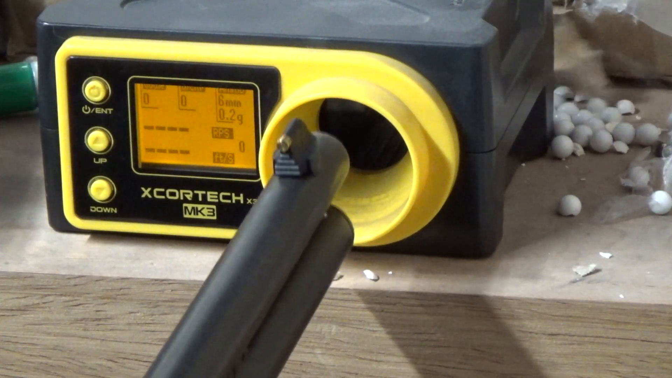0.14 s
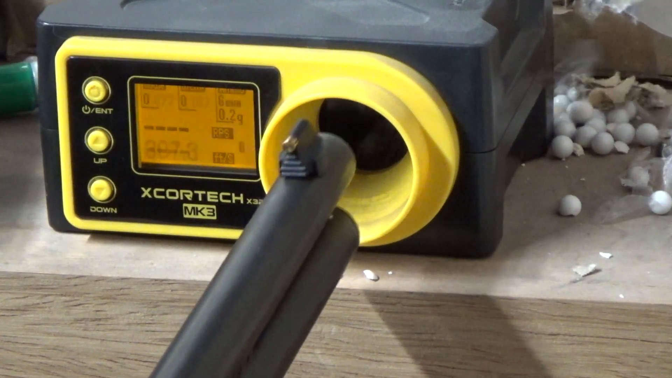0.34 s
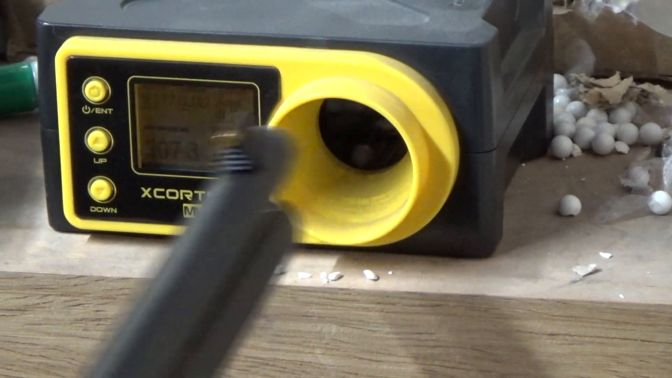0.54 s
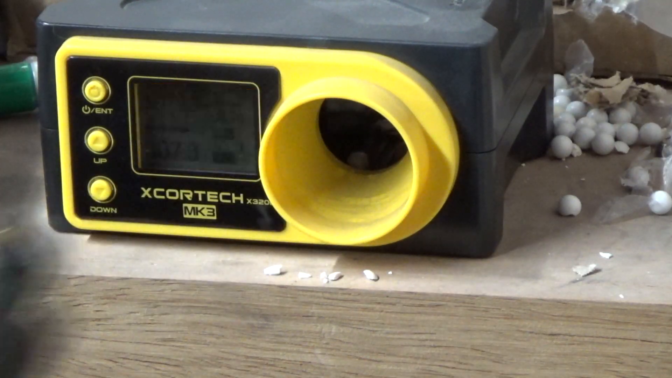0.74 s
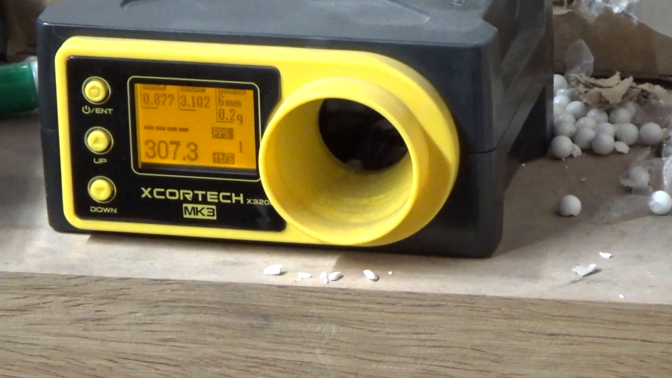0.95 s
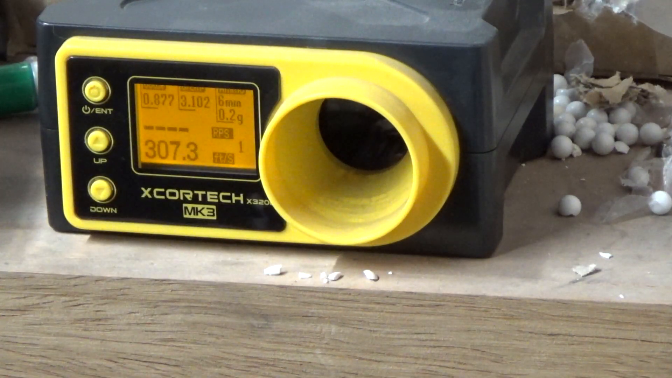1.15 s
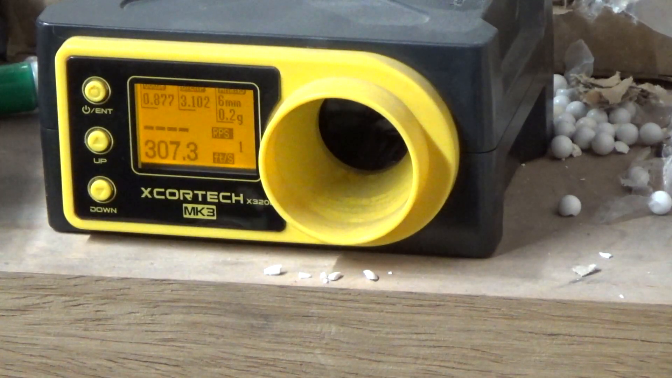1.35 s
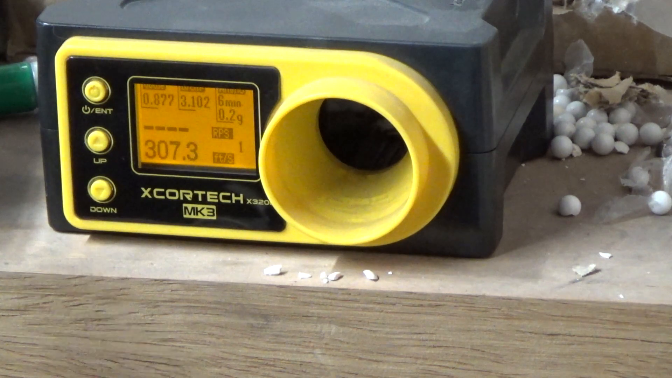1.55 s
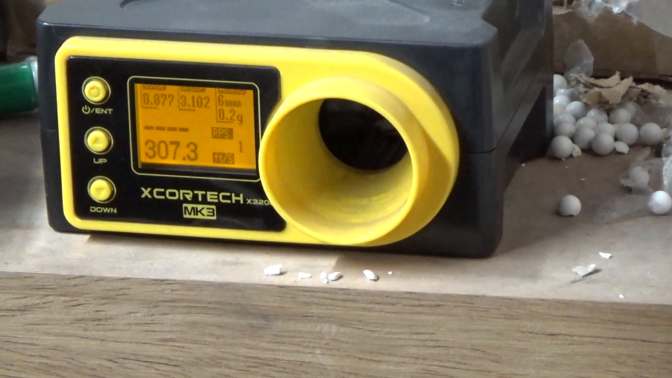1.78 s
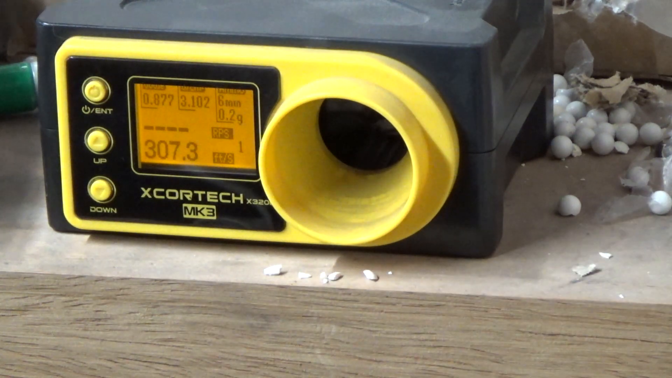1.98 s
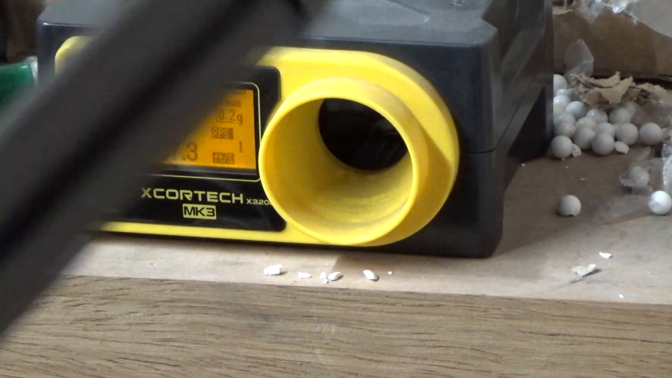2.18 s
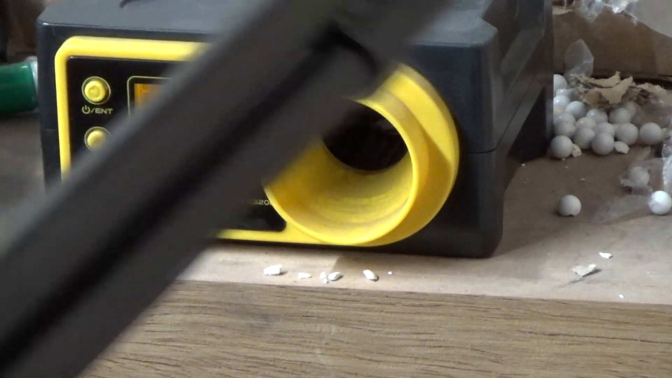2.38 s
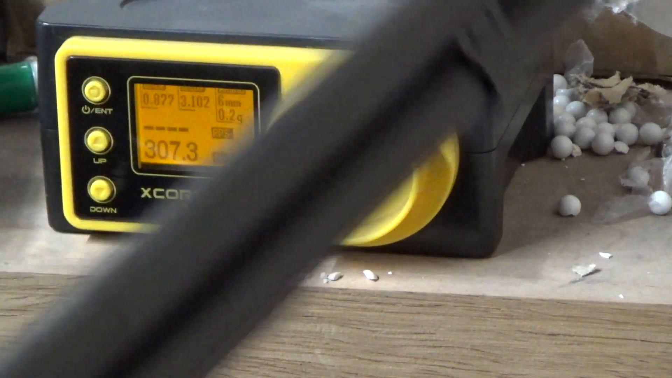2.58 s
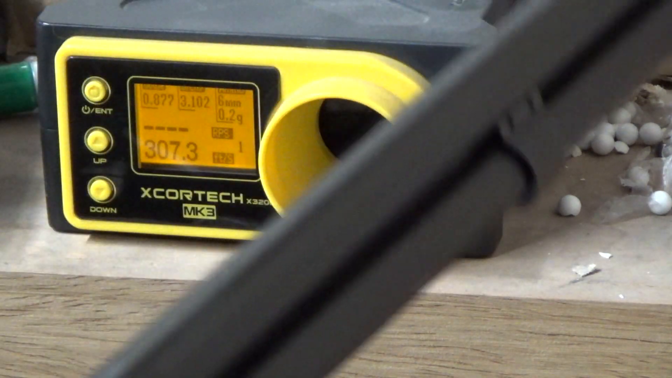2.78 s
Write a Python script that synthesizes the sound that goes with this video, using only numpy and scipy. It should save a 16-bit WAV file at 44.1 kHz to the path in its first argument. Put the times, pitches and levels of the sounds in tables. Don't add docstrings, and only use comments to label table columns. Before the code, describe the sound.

Air rifle fires with a sharp crack, pellet rattles in a trap, then lever clacks open and shut

```python
import sys
import numpy as np
from scipy import signal
from scipy.fft import rfft, irfft, next_fast_len
from scipy.io import wavfile
from scipy.ndimage import uniform_filter1d

SR = 44100
rng = np.random.default_rng(int(sys.argv[2]) if len(sys.argv) > 2 else 0)


def natural_amplitude(level_db):
    exponent = np.asarray(level_db, float) / 20
    return 10 ** exponent


def materialize(psi):
    bounded = np.clip(np.atleast_2d(psi).T, -1, 1)
    quanta = np.round(bounded * 32767).astype(np.int16)
    wavfile.write(sys.argv[1], SR, quanta)


N = 125685
TIME = np.arange(N) / SR
BLAST_S = .1594

# frequency_hz, side_over_mid_db
ROOM_WIDTH = [(60, -32), (150, -32), (380, -15.5), (950, -9.5), (2380, -13), (5980, -6.5), (15000, -21.5)]


def unit(x):
    return x / np.sqrt(np.mean(x ** 2) + 1e-20)


def along(points, hz):
    f, v = np.transpose(points)
    return np.interp(np.log(hz + 1), np.log(f + 1), v)


def filtered(x, response):
    m = next_fast_len(x.shape[-1] + 4096)
    spectrum = rfft(x, m) * response(np.fft.rfftfreq(m, 1 / SR))
    return irfft(spectrum, m)[..., :x.shape[-1]]


def body(peaks):
    def response(f):
        total = 0
        for k, (centre, width, db) in enumerate(peaks):
            damping = 1j * f * width
            total = total + (-1) ** k * natural_amplitude(db) * damping / (centre * centre - f * f + damping)
        return total
    return response


def lifted(peaks, db):
    return [(hz, width, level + db) for hz, width, level in peaks]


def stereo(pair, width):
    side = filtered(pair[1], lambda hz: natural_amplitude(along(width, hz)))
    return np.array([pair[0] + side, pair[0] - side])


def fading(fades, size, hold, patchy_db):
    hz, t, z = signal.stft(rng.standard_normal((2, size)), SR, nperseg=128)
    patches = unit(uniform_filter1d(rng.standard_normal(z.shape[1:]), size=3, axis=0))
    fall_db = -60 * np.maximum(t - hold, 0) / along(fades, hz)[:, None]
    return signal.istft(z * natural_amplitude(fall_db + patchy_db * patches), SR, nperseg=128)[1][:, :size]


def room(x, wet_db):
    # frequency_hz, t60_s
    late_fades = [(300, 0.14), (2000, 0.35), (6000, 0.27), (14000, 0.13)]
    early_t60_s, late_db, build_up_s = 0.021, -16.5, 0.0037
    t = np.arange(SR // 4) / SR
    tail = fading(late_fades, SR // 4, 0, patchy_db=4.0)
    tail = tail * (natural_amplitude(late_db) + natural_amplitude(-60 * t / early_t60_s)) * np.minimum(t / build_up_s, 1) ** 2
    echoes = signal.fftconvolve(x[None], tail / np.linalg.norm(tail[0]), axes=1)
    return natural_amplitude(wet_db) * stereo(echoes, ROOM_WIDTH)


def add(out, s, x):
    i = round(s * SR)
    out[:, i:i + x.shape[1]] += x[:, :N - i]


def strikes(hits, contact_s, wet_db, crack_db, top_hz=13500, edge=2.43):
    # centre_hz, width_hz
    contact_band = (2170, 11700)
    swell_s = .0006
    bench_s, bench_db = .0044, -13
    blur = 1.6
    out, t = np.zeros((2, N)), np.arange(2048) / SR

    def soft(hz):
        return 1 / (1 + .7j * hz / top_hz - (hz / top_hz) ** 2)

    def crack(hz):
        return body([(*contact_band, crack_db)])(hz) * hz / (hz - 1500j)

    for s, db, peaks in hits:
        chatter = rng.standard_normal(len(t)) * np.minimum(t / 0.00051, 1) * natural_amplitude(-60 * t / contact_s)
        push = chatter + edge * (t == 8 / SR)
        direct = body(peaks)
        diffuse = body([(hz, blur * width, level) for hz, width, level in peaks])
        ring, spread = filtered(
            push[None], lambda hz: soft(hz) * (crack(hz) + np.array([direct(hz), diffuse(hz)])))
        ring = ring * (1 - np.exp(-(t / swell_s) ** 2))
        ring = natural_amplitude(db) * ring / np.abs(ring).max()
        add(out, s, ring[None])
        add(out, s + bench_s, natural_amplitude(bench_db) * ring[None])
        add(out, s, room(unit(spread) * np.std(ring), wet_db))
    return out


def swept_level(points, gain_db, release_s):
    s, db = np.transpose(points)
    return natural_amplitude(gain_db + np.interp(TIME, [s[0] - .01, *s, s[-1] + release_s], [-90, *db, -90]))


def rub(force, peaks, rough_db, gain_db):
    grain = natural_amplitude(rough_db * unit(uniform_filter1d(rng.standard_normal(N), size=60)))
    noise = filtered(grain * rng.standard_normal((2, N)), body(peaks))
    return stereo(unit(noise), ROOM_WIDTH) * swept_level(force, gain_db, release_s=.03)


def air():
    # frequency_hz, level_db_per_hz
    hiss = [(15, -29), (25, -1.5), (313, -1.5), (433, -3), (878, -6), (1390, -7), (10700, -15),
            (15200, -16), (16500, -38)]
    # frequency_hz, width_hz, level_db
    hum = [(887, 11, 11.4), (956, 150, 1.4)]
    # frequency_hz, side_over_mid_db
    hiss_width = [(60, -21), (180, -8.5), (550, -3), (1650, -1.5), (4970, -6), (15000, -17)]
    level_db, duck_db, recover_s = -58, -2.5, 0.27
    noise = filtered(rng.standard_normal((2, N)),
                     lambda hz: natural_amplitude(along(hiss, hz)) * (1 + np.abs(body(hum)(hz))))
    gain_db = duck_db * (TIME > BLAST_S) * np.exp(-np.maximum(TIME - .5, 0) / recover_s)
    return natural_amplitude(level_db + gain_db) * stereo(unit(noise), hiss_width)


def bench_thump():
    out, t = np.zeros((2, N)), np.arange(SR // 4) / SR
    swing = np.sin(2 * np.pi * 69 * t) * (t / 0.031) * np.exp(1 - t / 0.042)
    add(out, 0.11, natural_amplitude(-50.5) * swing * np.ones((2, 1)))
    return out


def gas_blast():
    # frequency_hz, level_db_per_hz
    jet = [(24, -54), (40, -26), (444, -10), (770, -6.5), (1630, -9), (5180, -6.5), (6490, -12), (9940, -9),
           (16000, -21.5)]
    # frequency_hz, width_hz, level_db
    barrel = [(860, 110, -1.5), (5300, 400, -2), (10800, 1500, 2.5)]
    # frequency_hz, t60_s
    gas_fades = [(60, 0.93), (200, 0.25), (1000, 0.3), (3000, 0.48), (10000, 0.28)]
    rise_s, hold_s, blast_db, sear_db = 0.053, 0.074, -18, -42.5
    gas = fading(gas_fades, SR // 2, hold_s, patchy_db=1.5)
    gas = filtered(gas, lambda hz: natural_amplitude(along(jet, hz)) * (1 + np.abs(body(barrel)(hz))))
    rise = np.minimum(np.arange(SR // 2) / SR / rise_s + 0.59, 1) ** 2
    gas = gas / np.std(gas[0, :2048]) * rise
    out = np.zeros((2, N))
    add(out, BLAST_S, natural_amplitude(blast_db) * stereo(gas, ROOM_WIDTH))
    add(out, BLAST_S - .009, natural_amplitude(sear_db) * gas[:, 999:1399])
    return out


def muzzle_cracks():
    # start_s, peak_db
    cracks = [
        (.1594, -8),
        (.1626, -5.5),
        (.1678, -6.5),
        (.1733, -11),
        (.1765, -9),
    ]
    # frequency_hz, width_hz, level_db
    muzzle = [(800, 230, -11), (2200, 390, -10), (5170, 520, -3.5), (10180, 920, -0.5), (12200, 720, -8.5)]
    return strikes([(s, db, muzzle) for s, db in cracks], contact_s=0.0049, wet_db=-8, crack_db=-10.0)


def pellet():
    # start_s, peak_db, rim_hz, rim_db, wall_knock_db
    bounces = [(.2818, -13, 12300, -4, -12), (.2992, -4.5, 11800, 0, -15), (.3167, -10, 11200, 16, -6),
               (.3180, -12, 11200, 16, -6), (.3248, -11, 10800, 0, -7), (.3298, -19, 11200, 14, -2),
               (.3466, -13, 11600, -4, -3), (.3518, -9, 11300, -6, -8), (.3640, -25, 12900, -3, 0),
               (.3869, -10, 11900, -5, -10), (.3890, -12, 11500, -7, -17), (.3941, -14, 12300, -10, -13),
               (.4064, -27, 11400, -6, -7), (.4179, -17, 10900, -8, -5), (.4303, -16, 12100, 9, 3),
               (.4311, -16, 11800, 9, 3), (.4446, -14, 11100, -11, -8), (.4641, -15, 11700, -8, -5),
               (.4800, -29, 11800, -4, 2), (.4853, -18, 11100, -15, -8), (.4977, -33, 10600, -2, -1),
               (.5150, -39, 11600, -8, 7), (.5270, -31, 11500, -12, 1), (.5414, -41, 11500, -12, 5)]
    # frequency_hz, width_hz, level_db
    trap_walls = [(1400, 700, -10), (2450, 500, -4), (3400, 500, -9), (4400, 500, -1), (5150, 500, -4),
                  (6500, 600, -5), (7750, 500, -6)]
    # frequency_hz, width_hz, level_db
    trap_pings = [(9700, 420, 1), (12750, 700, -6)]
    hits = []
    for s, db, rim_hz, rim_db, knock_db in bounces:
        rim = (rim_hz, 377, rim_db)
        hits.append((s, db, lifted(trap_walls, knock_db) + [trap_pings[0], rim, trap_pings[1]]))
    return strikes(hits, contact_s=0.0025, wet_db=-3.5, crack_db=-22, top_hz=14500, edge=8.)


def single_mode_ticks():
    # start_s, peak_db, frequency_hz, width_hz
    tick_rows = [(1.169, -46, 4500, 3020), (1.2596, -50, 10300, 2970), (1.866, -43, 760, 79),
                 (1.943, -43.5, 1630, 500), (1.997, -45, 3800, 900), (2.0028, -37.5, 5500, 4000),
                 (2.173, -46, 7300, 3000), (2.283, -54, 9900, 805), (2.421, -32, 2800, 180),
                 (2.4226, -25.5, 7000, 9000), (2.5668, -24, 4500, 4000), (2.429, -37, 600, 130),
                 (2.449, -28.5, 545, 111), (2.4585, -28, 570, 111), (2.5424, -27.5, 590, 110),
                 (2.568, -56, 603, 130), (2.588, -34, 600, 130)]
    hits = [(s, db, [(hz, width, 0)]) for s, db, hz, width in tick_rows]
    return strikes(hits, contact_s=0.0099, wet_db=-1.5, crack_db=-37.5, edge=8.)


def palm_slide():
    # time_s, force_db
    grip = [
        (1.27, -66),
        (1.36, -79),
        (1.5, -74.5),
        (1.68, -58.5),
        (1.78, -79),
        (1.9, -60.5),
        (2.0, -77),
    ]
    # frequency_hz, width_hz, level_db
    palm = [(6000, 10000, -11), (11500, 2100, -3)]
    return rub(grip, palm, rough_db=0.5, gain_db=3.0)


def lever_opening():
    # time_s, force_db
    opening = [
        (1.668, -60.5),
        (1.692, -39.5),
        (1.736, -43.5),
        (1.752, -52.5),
        (1.785, -56.5),
    ]
    # frequency_hz, width_hz, level_db
    open_body = [(500, 230, -11.5), (980, 160, -1.5), (1280, 430, -3), (4500, 1800, -7.5),
                 (11100, 1500, -12)]
    return rub(opening, open_body, rough_db=4.5, gain_db=-1)


def groan(rows, waver_hz, rough_db):
    s, hz, db = np.transpose(rows)
    waver, rough = [unit(uniform_filter1d(rng.standard_normal(N), size=150)) for _ in range(2)]
    pitch_hz = np.interp(TIME, s, hz) + waver_hz * waver
    tone = np.sin(2 * np.pi * np.cumsum(pitch_hz) / SR)
    return tone * natural_amplitude(rough_db * rough) * swept_level(np.transpose([s, db]), gain_db=1.5, release_s=.01)


def pivot_groans():
    # time_s, pitch_hz, level_db
    groans = [
        [(1.676, 1422, -50), (1.692, 1382, -57), (1.702, 1357, -46), (1.714, 1320, -45), (1.728, 1394, -55),
         (1.745, 1340, -54), (1.76, 1335, -59)],
        [(1.68, 891, -66), (1.688, 860, -43), (1.698, 888, -63), (1.715, 980, -57), (1.723, 1042, -47.5),
         (1.736, 914, -45.5), (1.748, 963, -56), (1.775, 990, -58)],
    ]
    return sum(groan(rows, waver_hz=54.3, rough_db=1.5) for rows in groans)


def steel_snaps():
    # start_s, peak_db, spring_db
    snaps = [
        (1.7055, -18, 6),
        (1.7176, -27, 0),
        (2.4227, -16, 4),
        (2.5663, -11.5, -9),
        (2.5714, -14, -9),
        (2.5732, -21, -6),
        (2.5824, -24, -6),
        (2.6015, -26, -7),
    ]
    # frequency_hz, width_hz, level_db
    thin_steel = [(3570, 2300, -2), (5500, 3000, -2), (9280, 2400, 1), (11340, 720, 2.5)]
    # frequency_hz, width_hz, level_db
    spring = [(12250, 1000, -2), (13600, 1000, -9)]
    hits = [(s, db, thin_steel + lifted(spring, high_db)) for s, db, high_db in snaps]
    return strikes(hits, contact_s=0.0048, wet_db=-0.5, crack_db=-14, top_hz=17400, edge=6.0)


def latch():
    # start_s, peak_db
    latch_hits = [
        (1.7905, -42),
        (1.7929, -8),
        (1.7938, -9),
        (1.7953, -14),
        (1.8012, -23),
        (1.8052, -21),
    ]
    # frequency_hz, width_hz, level_db
    latch_body = [(2490, 410, -10.5), (3900, 340, -1.5), (5500, 710, 0.5), (7190, 450, 2),
                  (9200, 730, -4.5), (11540, 2600, -8), (13600, 660, -6.5)]
    hits = [(s, db, latch_body) for s, db in latch_hits]
    return strikes(hits, contact_s=0.0061, wet_db=-5.5, crack_db=-19, top_hz=15500, edge=5.5)


def lever_shutting():
    # time_s, force_db
    shutting = [
        (2.422, -41),
        (2.445, -31),
        (2.5, -41.5),
        (2.525, -32.5),
        (2.55, -39),
        (2.565, -35.5),
        (2.61, -38),
        (2.69, -70),
    ]
    # frequency_hz, width_hz, level_db
    shut_body = [(570, 170, -1.5), (1410, 500, -3), (4000, 3100, -6), (12270, 510, 0), (13900, 1100, -9)]
    return rub(shutting, shut_body, rough_db=2.2, gain_db=-2.0)


def lever_clacks():
    # start_s, peak_db, stock_over_steel_db, knock_hz, clank_hz
    clacks = [(2.4232, -28, 0, 1250, 4500), (2.4479, -16, -9, 2400, 5100), (2.4522, -17, 10, 1800, 3150),
              (2.4552, -16, 10, 1620, 4300), (2.4672, -22, 6, 1600, 4800), (2.4835, -29, 6, 2000, 4500),
              (2.5098, -32, -3, 1700, 5100), (2.5185, -27, -4, 2200, 5300), (2.5212, -29, 7, 1700, 4500),
              (2.5392, -16, 7, 1480, 4400), (2.5651, -20, 6, 2150, 3400)]
    # frequency_hz, width_hz, level_db
    stock = [(570, 49, -9), (1230, 82, -15.5)]
    # frequency_hz, width_hz, level_db
    frame = [(2800, 360, -27.5), (5900, 700, -14), (7300, 370, -12), (9800, 250, -11.5), (11800, 160, -18)]
    hits = []
    for s, db, stock_db, knock_hz, clank_hz in clacks:
        contact = [(knock_hz, 220, stock_db), (clank_hz, 500, 0)]
        hits.append((s, db, lifted(stock, stock_db) + contact + frame))
    return strikes(hits, contact_s=0.0067, wet_db=-3.5, crack_db=-29.0, edge=3.0)


def hinge_squeal():
    # time_s, force_db
    squeal = [
        (2.515, -70),
        (2.54, -38),
        (2.562, -43),
    ]
    # frequency_hz, width_hz, level_db
    hinge = [(9000, 210, -7), (12800, 190, -3), (14100, 700, -12)]
    return rub(squeal, hinge, rough_db=1.5, gain_db=2.5)


def lever():
    small_hz = 378
    slide = palm_slide() + lever_opening() + pivot_groans() + lever_shutting() + hinge_squeal()
    left = natural_amplitude([[.6], [-.6]])
    parts = (slide + steel_snaps() + lever_clacks()) * left + latch() + single_mode_ticks()

    def radiation(hz):
        ratio = small_hz / (hz + 1)
        return 1 / (1 - 1.2j * ratio - ratio ** 2)

    return filtered(parts, radiation)


def scene():
    return air() + bench_thump() + gas_blast() + muzzle_cracks() + pellet() + lever()


def low_pass(x):
    return signal.sosfilt(signal.butter(12, 16970, fs=SR, output="sos"), x)


def record(dry):
    mix = filtered(dry, lambda hz: np.where(hz < 15950, 1, natural_amplitude(-36) * (hz < 16950)))
    return low_pass(mix)


dry = scene()
out = record(dry)
materialize(out)
```